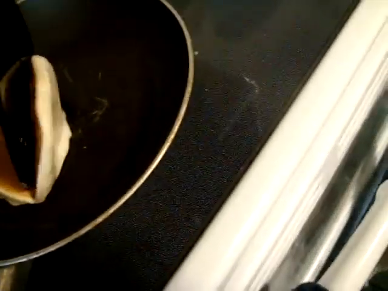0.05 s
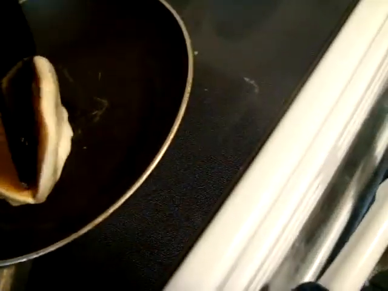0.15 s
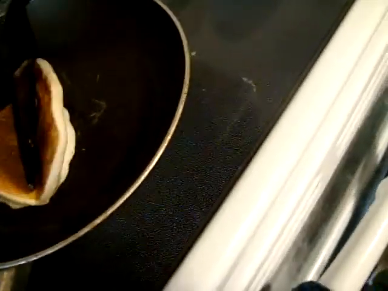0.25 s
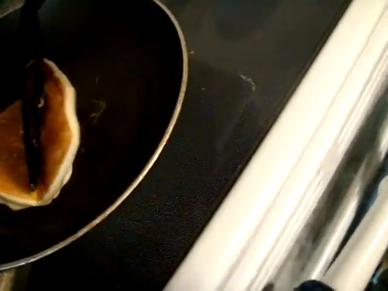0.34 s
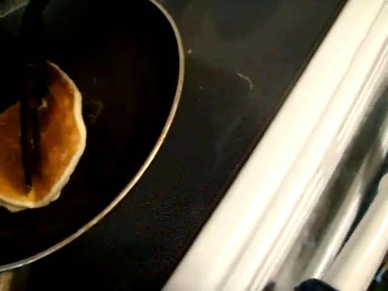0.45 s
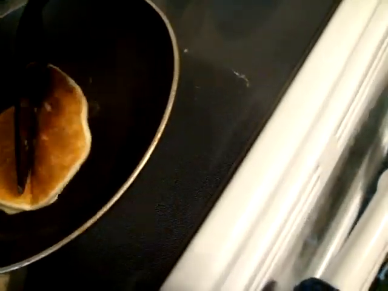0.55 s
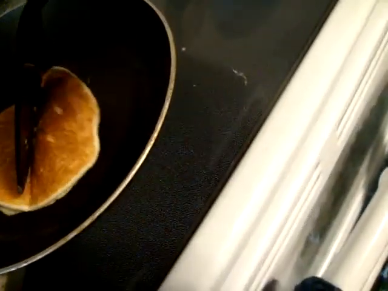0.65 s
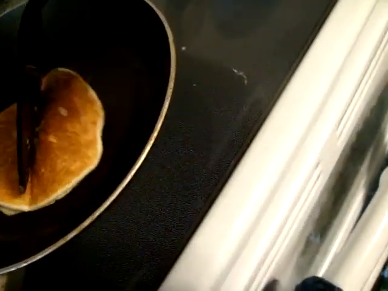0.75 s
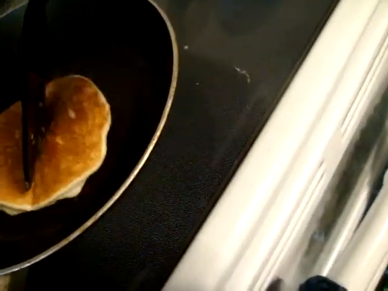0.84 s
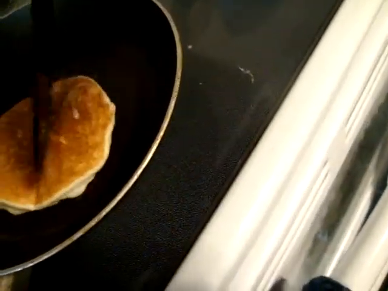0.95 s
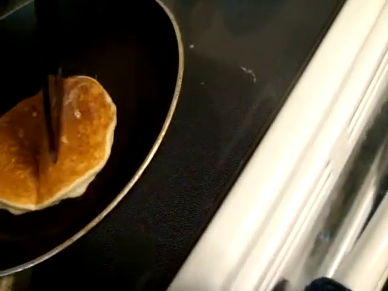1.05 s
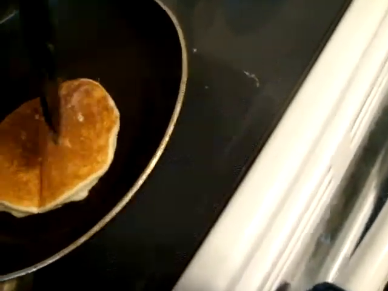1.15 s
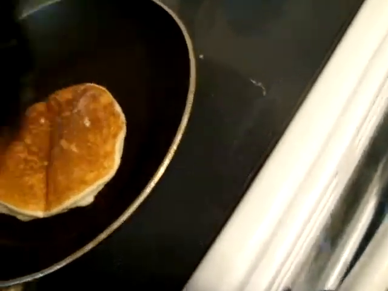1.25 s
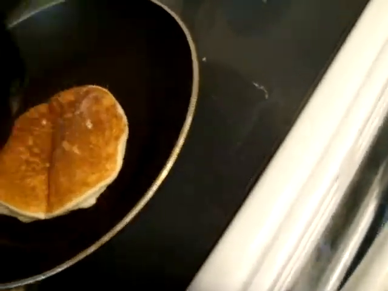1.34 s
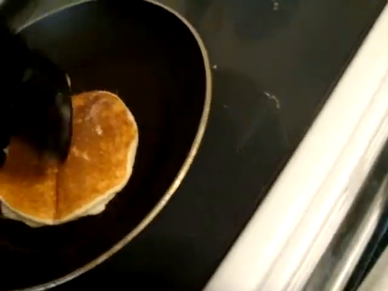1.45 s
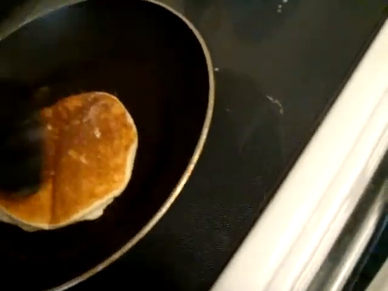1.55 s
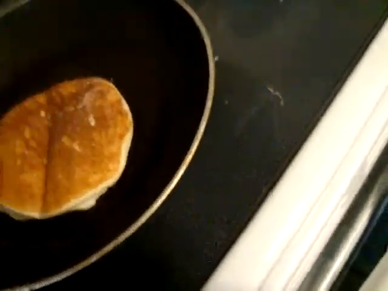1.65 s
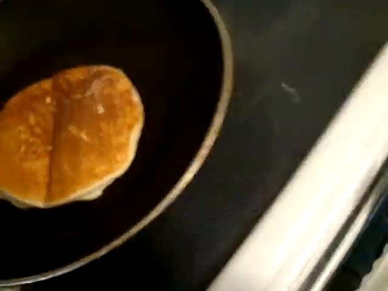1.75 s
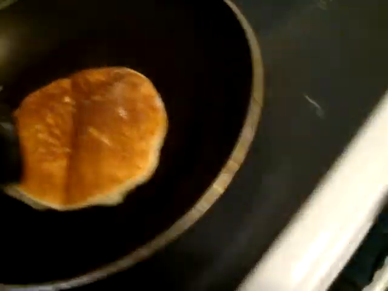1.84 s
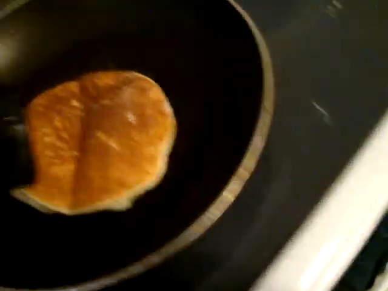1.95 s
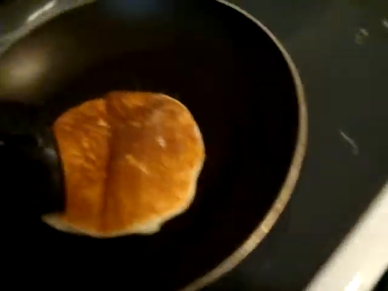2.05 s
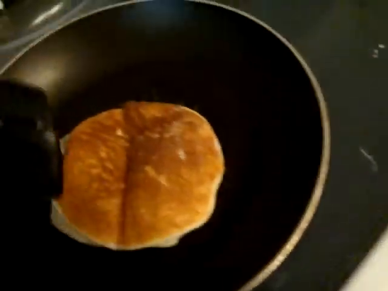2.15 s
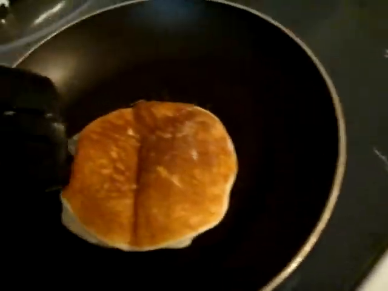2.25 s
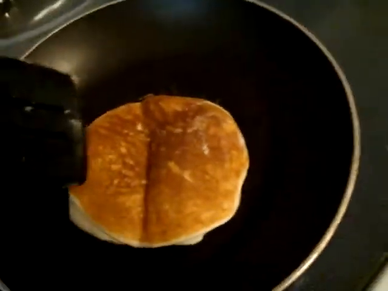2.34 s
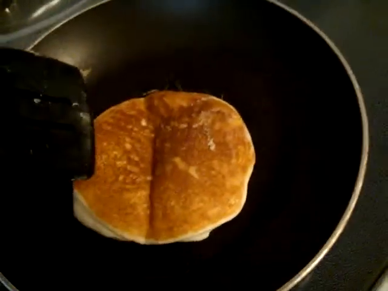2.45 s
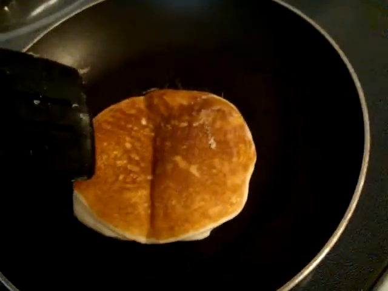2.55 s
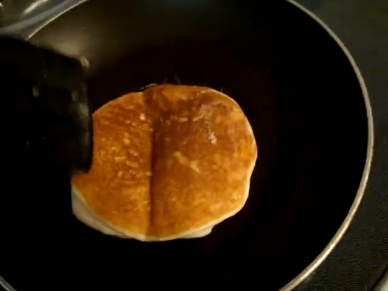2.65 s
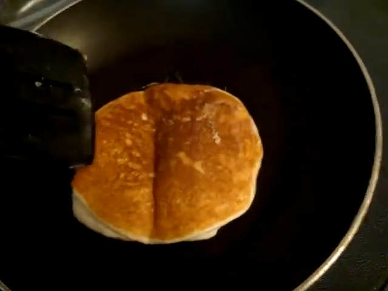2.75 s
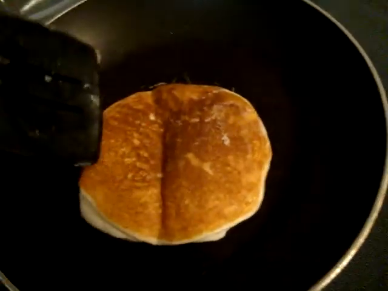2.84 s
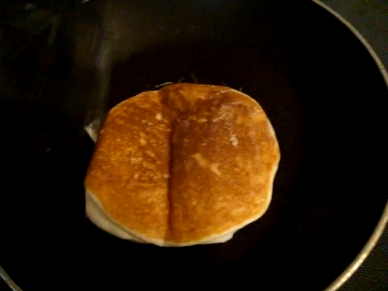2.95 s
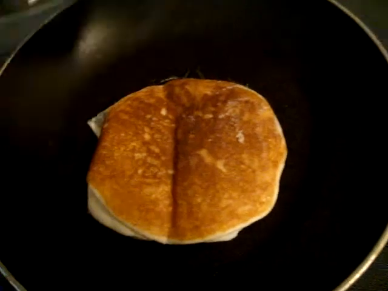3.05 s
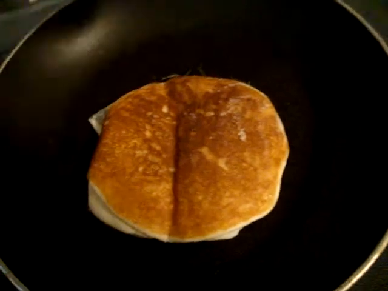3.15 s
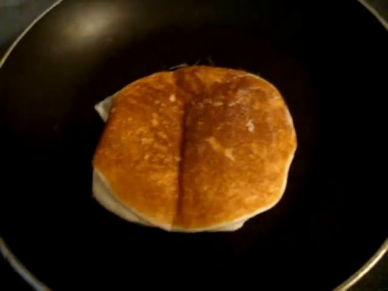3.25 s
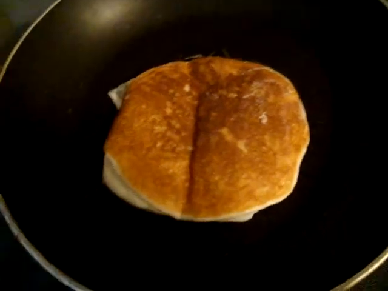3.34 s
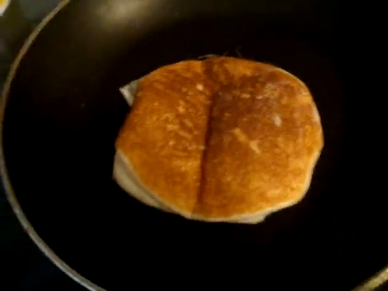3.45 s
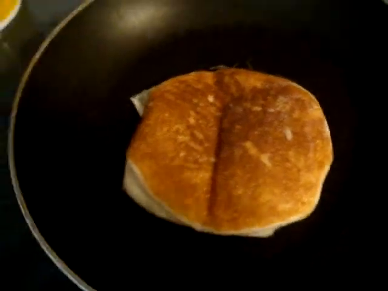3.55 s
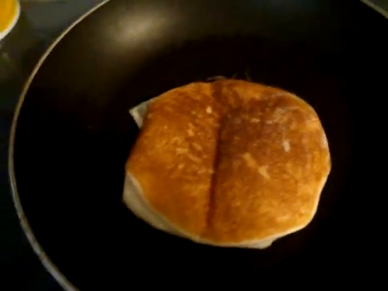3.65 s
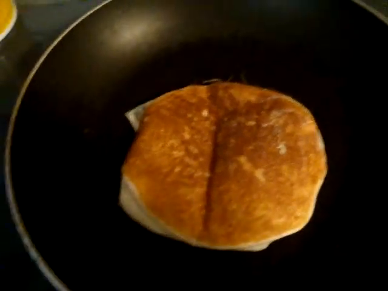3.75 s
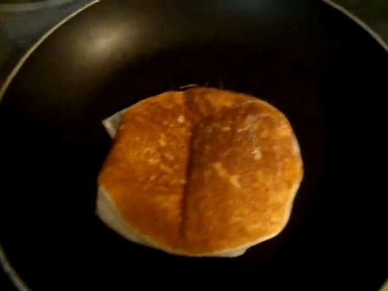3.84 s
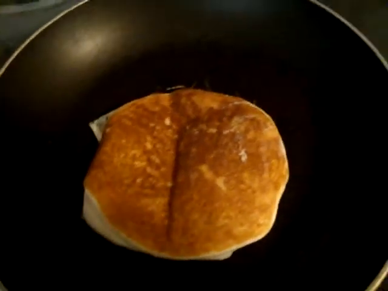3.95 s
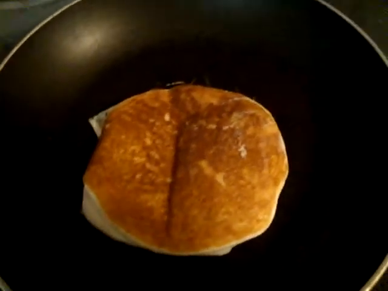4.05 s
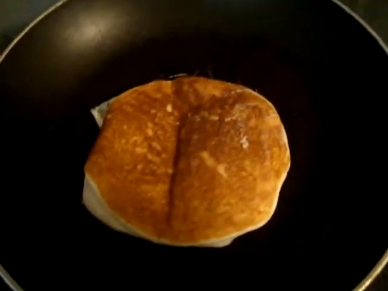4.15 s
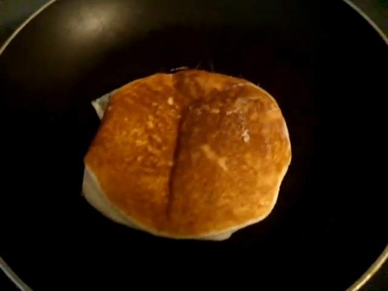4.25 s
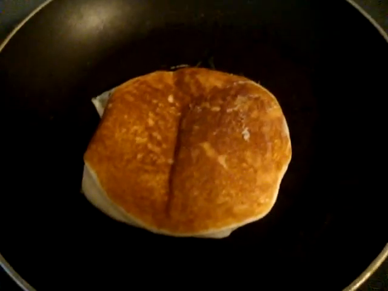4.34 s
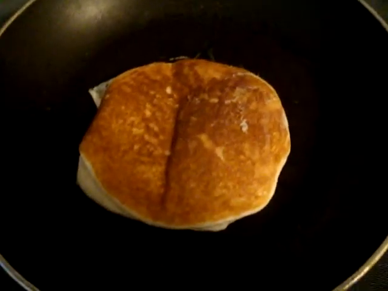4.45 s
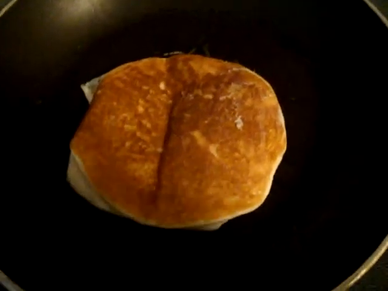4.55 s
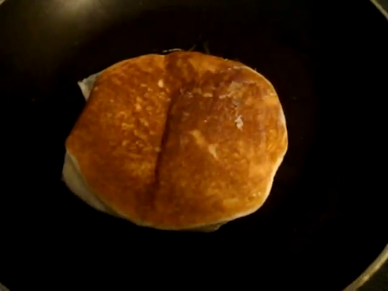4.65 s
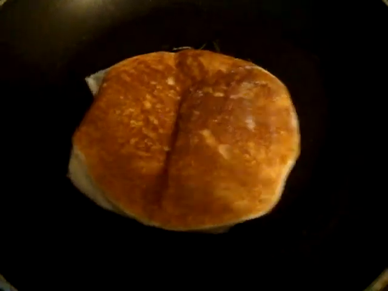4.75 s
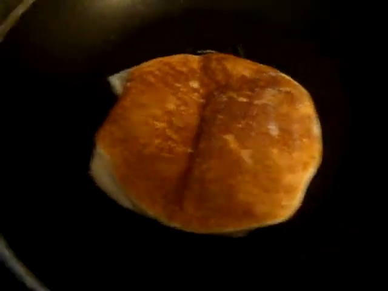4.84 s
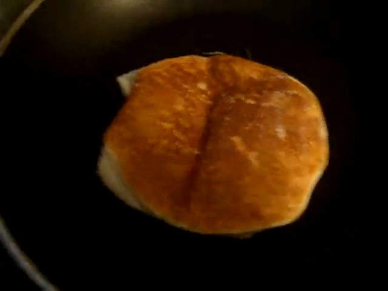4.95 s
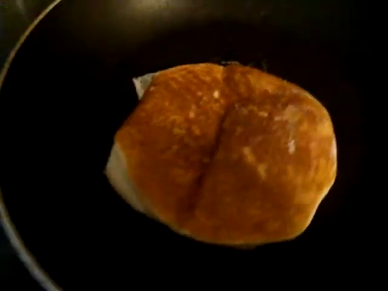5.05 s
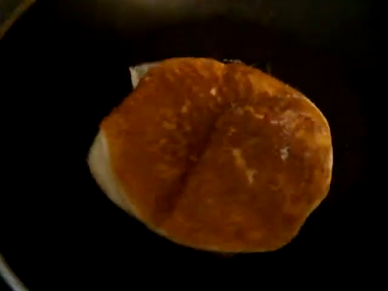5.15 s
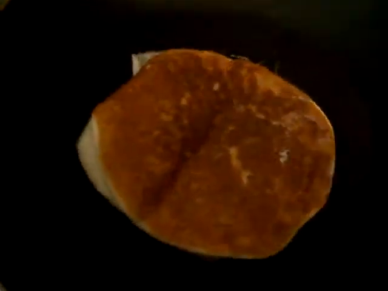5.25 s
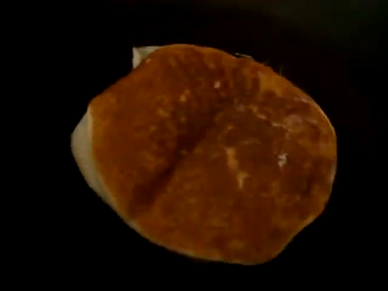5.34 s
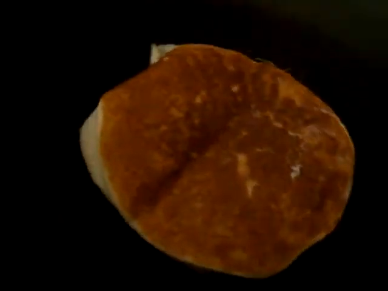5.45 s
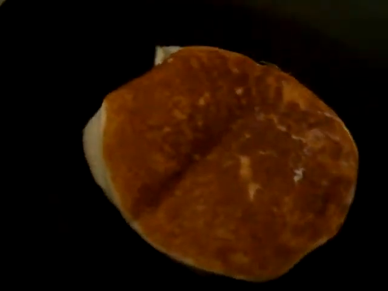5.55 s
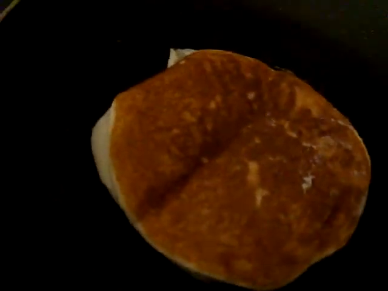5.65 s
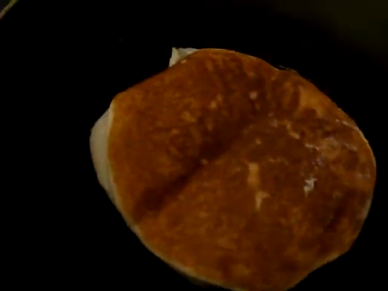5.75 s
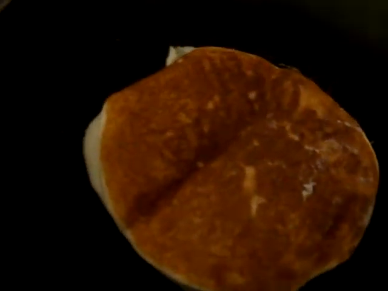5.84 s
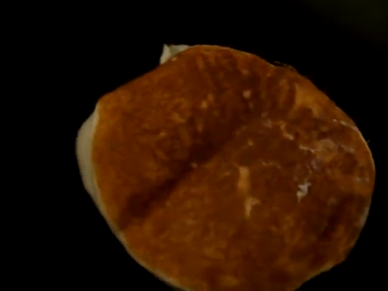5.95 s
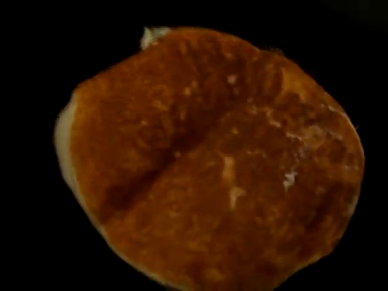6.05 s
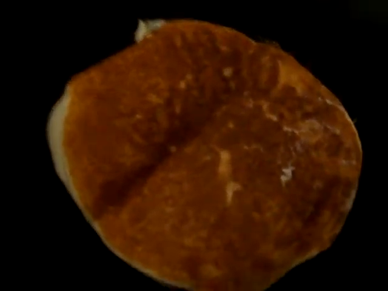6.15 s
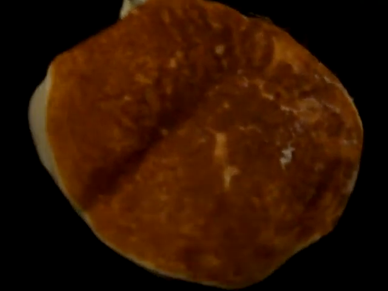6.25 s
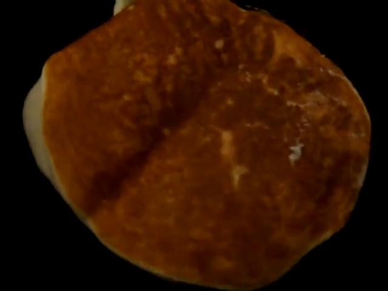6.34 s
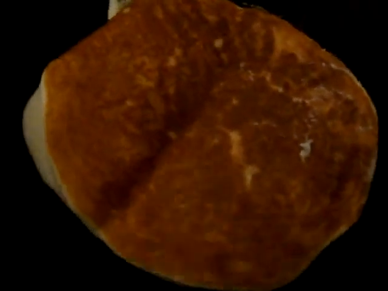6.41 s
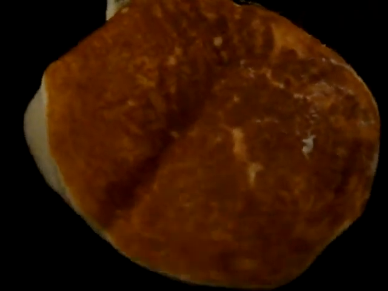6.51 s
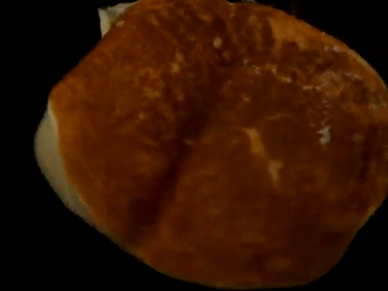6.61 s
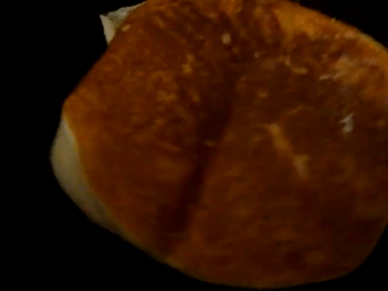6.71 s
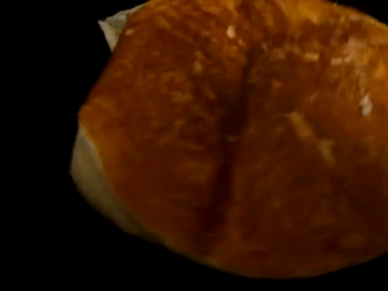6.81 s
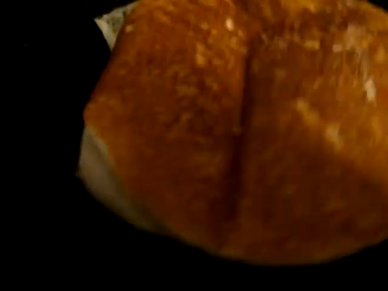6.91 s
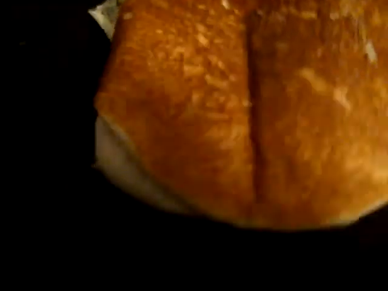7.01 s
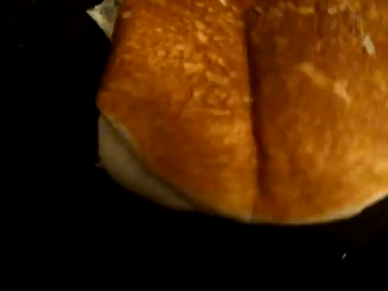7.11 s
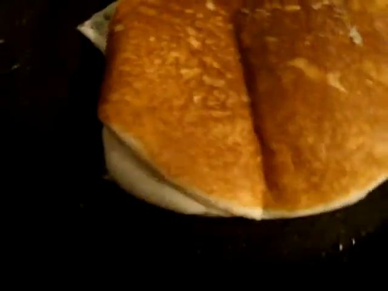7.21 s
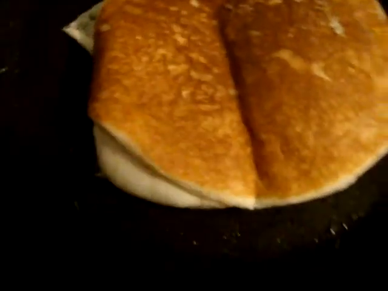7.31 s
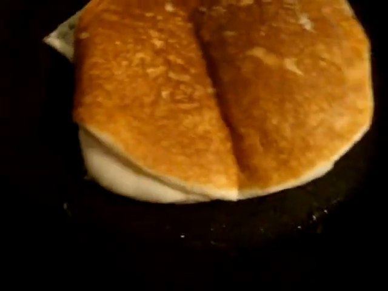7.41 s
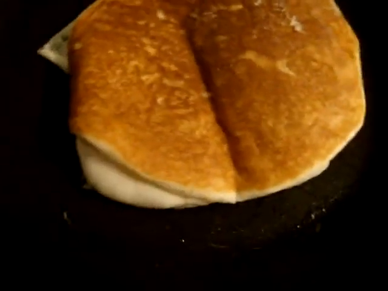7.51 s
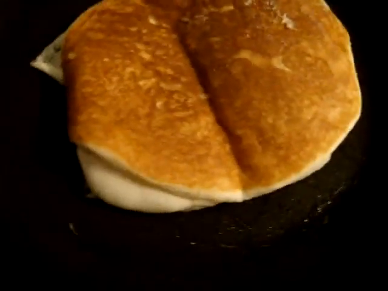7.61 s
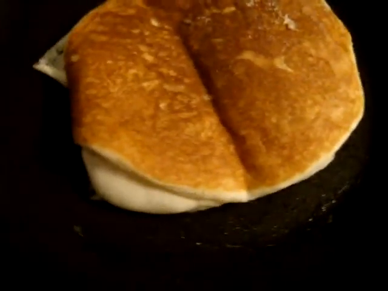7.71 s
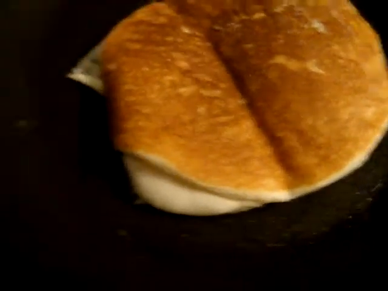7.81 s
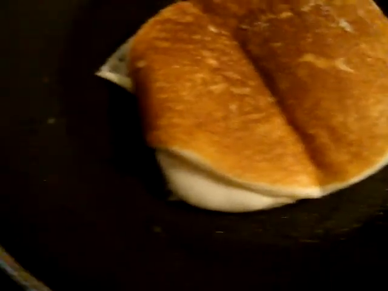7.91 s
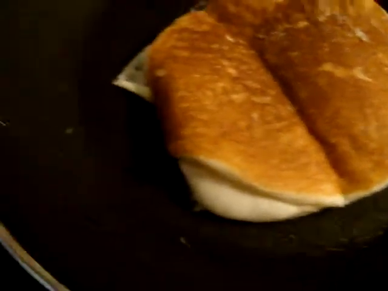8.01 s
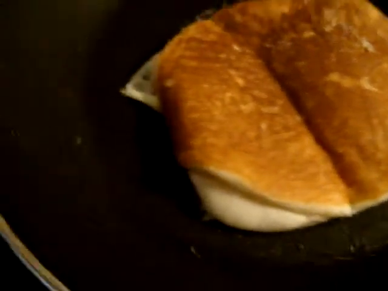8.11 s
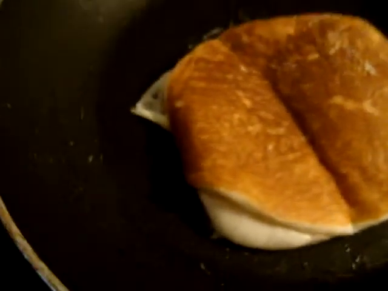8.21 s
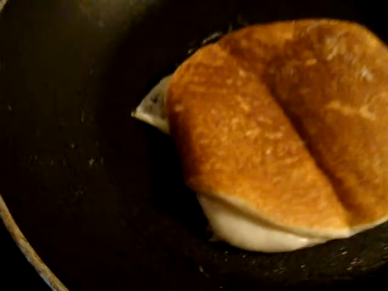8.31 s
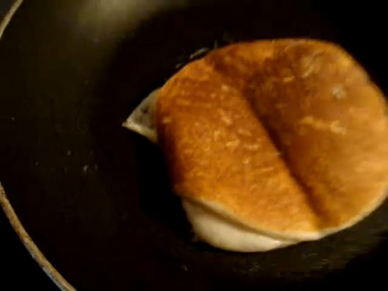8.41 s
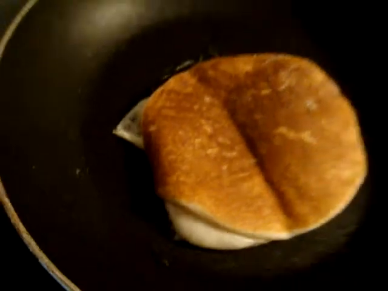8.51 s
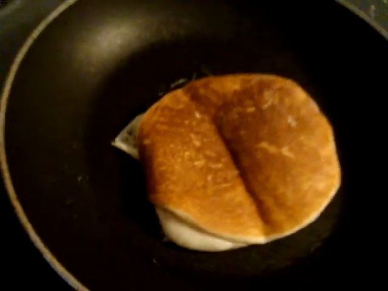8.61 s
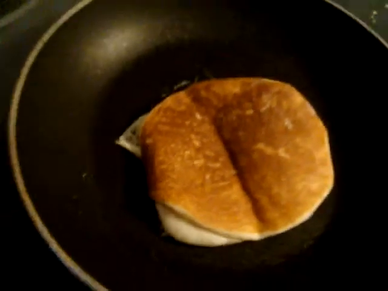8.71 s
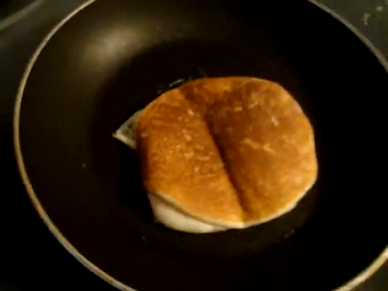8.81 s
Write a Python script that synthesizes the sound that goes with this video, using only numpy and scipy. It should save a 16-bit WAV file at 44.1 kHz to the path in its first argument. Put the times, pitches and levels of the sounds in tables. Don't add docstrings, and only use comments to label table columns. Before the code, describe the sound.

A low, airy extractor fan with soft duct hum runs steadily throughout, in a small kitchen with short reverberation. From 0 s a pancake's wet side meets the hot pan: bright steam fizz surges from about 0.15 s, fluttering in uneven spurts over a softer boiling seethe, with loud snapping pops and slight low air puffs. By 1.4 s the fizz falls away, leaving fine crackle and crisp, high pops until 4 s. Around 3.95 s a spatula scrapes; at 4.1 to 4.3 s it strikes the counter in hard, rattling metallic blows, the loudest overloading, then slides to rest with dull cabinet thumps by 4.55 s. Afterwards the crackle is muffled and fading, with irregular small pops, mostly lower and softer, and a few tiny bubble blips near 5.4 s. Faint breathy steam whistles leak at 7.6, 8.3 and 8.7 s before the end near 8.9 s. Close microphone, limited treble.

```python
import sys
import numpy as np
from scipy import signal
from scipy.fft import rfft, irfft, next_fast_len
from scipy.io import wavfile

SR = 44100
rng = np.random.default_rng(int(sys.argv[2]) if len(sys.argv) > 2 else 0)


def generate_wav(sig):
    pcm = np.round(np.clip(np.atleast_2d(sig).T, -1, 1) * 32767).astype(np.int16)
    wavfile.write(sys.argv[1], SR, pcm)


def natural_amplitude(level_db):
    exponent = np.asarray(level_db, float) / 20
    return 10 ** exponent


N = 391166


def rms_one(x):
    return x / np.sqrt(np.mean(x ** 2) + 1e-20)


def in_time(rows):
    s, *columns = np.transpose(rows)
    return [np.interp(np.arange(N) / SR, s, c) for c in columns]


def swell(start, db, attack_s, hold_s, dies_db_per_s):
    t = np.arange(N) / SR - start
    decay_s = np.maximum(t - attack_s - hold_s, 0)
    return np.clip(t / attack_s, 0, 1) ** 2 * natural_amplitude(db - dies_db_per_s * decay_s)


def drift(rate):
    r = np.exp(-80 * np.pi * rate / SR)
    draws = rng.standard_normal(N // 40 + 2002)
    slow = signal.lfilter([1], [1, -2 * r, r * r], draws)[2000:]
    return np.interp(np.arange(N) / 40, np.arange(len(slow)), rms_one(slow))


def colour(x, spectrum):
    hz, db = np.transpose(spectrum)
    size = next_fast_len(N)
    f = np.arange(size // 2 + 1) * SR / size + 1
    gain = natural_amplitude(np.interp(np.log(f), np.log(hz), db))
    return rms_one(irfft(rfft(x, size) * gain, size)[:N])


def ring(clicks, hz, t60):
    r, w = natural_amplitude(-60 / (t60 * SR)), 2 * np.pi * hz / SR
    return signal.lfilter([0, np.sin(w)], [1, -2 * r * np.cos(w), r * r], clicks + 1e-18)


def narrow_noise(modes):
    return sum(natural_amplitude(db) * rms_one(ring(rng.standard_normal(N), hz, 2.2 / width)) for hz, width, db in modes)


def add(out, s, sound):
    i = round(s * SR)
    out[i:i + len(sound)] += sound[:N - i]


def band(x, lo_hz, hi_hz):
    return signal.sosfilt(signal.butter(2, [lo_hz, min(hi_hz, .45 * SR)], "band", fs=SR, output="sos"), x)


def bursts(per_s, spread_db, length_s, bed):
    sizes = natural_amplitude(spread_db * np.minimum(rng.exponential(1, N), 2.5))
    born = rng.random(N) < per_s / SR
    r = np.exp(-1 / (length_s * SR))
    gate = rms_one(signal.lfilter([1], [1, -r], sizes * born + 1e-18))
    return (gate + bed) * rng.standard_normal(N)


# (time [s], level [dB])
STEAM_FORCE = [(0, -32.5), (.1, -30.5), (.15, -21), (.18, -26.5), (.25, -22), (.28, -18), (.42, -22.5),
               (.62, -22.5), (.66, -27), (.7, -20), (.782, -18.5), (.788, -28), (.88, -32), (.92, -23),
               (.98, -29), (1.0, -22.5), (1.11, -24.5), (1.4, -31)]


def steam_decay():
    force_db, = in_time(STEAM_FORCE)
    return force_db, np.maximum(np.arange(N) / SR - STEAM_FORCE[-1][0], 0)


# (frequency [Hz], density [dB per Hz])
FIZZ_SPECTRUM = [(1470, -37), (2500, -11), (3490, -31), (4660, -13.5), (6180, 1.5), (7220, 3), (9580, -4.5),
                 (9920, -4), (12900, -35), (21800, -120)]


def fizz():
    force_db, after = steam_decay()
    level_db = force_db - 16 * after - 3.5 * np.minimum(after / 0.1, 1)
    jet = colour(bursts(1300, spread_db=2.5, length_s=.0005, bed=.5), FIZZ_SPECTRUM)
    wide_gap = swell(.22, -4.5, attack_s=.03, hold_s=.43, dies_db_per_s=2000)
    return natural_amplitude(level_db - 6.0) * (jet + wide_gap * rms_one(band(jet, 4070, 6160)))


# (frequency [Hz], density [dB per Hz])
SEETHE_SPECTRUM = [(290, -44), (500, -30), (829, -1), (1040, -2.5), (1190, 1), (1410, -2.5), (3480, -7),
                   (4500, -3.5), (5850, -3.5), (9900, -120)]


def seethe():
    force_db, after = steam_decay()
    level_db = -36.5 + 0.47 * (force_db + 22) - 7.5 * after - 3.5 * np.minimum(after / 0.13, 1)
    boil = colour(bursts(600, spread_db=2.5, length_s=.0008, bed=2.5), SEETHE_SPECTRUM)
    return natural_amplitude(level_db + 4.0) * boil


# (frequency [Hz], density [dB per Hz])
CRACKLE_SPECTRUM = [(880, -26), (1500, -17), (2280, -1.5), (2780, -0.5), (5190, -4.5), (9540, 5.5),
                    (9920, 4), (12900, -86), (21800, -120)]


def crackle():
    t = np.arange(N) / SR
    per_s = 110 + 300 * np.exp(-t / 1.1)
    crust_s, crusting_s, crust_loss_db, cooling_db_per_s = 3.75, 0.8, 7.5, 2.67
    level_db = -41.5 - crust_loss_db / (1 + np.exp((crust_s - t) / crusting_s * 4))
    level_db -= cooling_db_per_s * np.maximum(t - crust_s, 0)
    rate = per_s * natural_amplitude(3.5 * drift(11))
    cracks = bursts(rate, spread_db=-1.0, length_s=0.00035, bed=0.026)
    return natural_amplitude(level_db) * colour(cracks, CRACKLE_SPECTRUM)


# (frequency [Hz], density [dB per Hz])
FAN_SPECTRUM = [(15, -44), (25, -24), (53, -9), (159, 0), (298, 2.5), (355, -1.5), (557, 1.5), (632, -3.5),
                (853, -4.5), (1180, -11), (1810, -8), (2440, -10.5), (3470, -13.5), (9200, -20.5),
                (9920, -37), (12900, -41), (21800, -120)]
# (time [s], level [dB])
FAN_LEVEL = [(0, -42.5), (1.3, -41), (2, -44), (4, -42.5), (6, -44), (8.5, -44), (8.87, -48.5)]
# (frequency [Hz], width [Hz], level [dB])
DUCT_MODES = [(105, 3.6, -58), (156.6, 1.5, -52), (201, 2.6, -51.5), (276.6, 12, -53), (315, 9.4, -52.5),
              (341, 10, -61), (403.5, 24, -48.5), (497, 16, -62)]


def fan():
    level_db, = in_time(FAN_LEVEL)
    level_db = level_db + .4 * drift(3)
    air = colour(rng.standard_normal(N), FAN_SPECTRUM)
    return natural_amplitude(level_db + 1.5) * air + natural_amplitude(level_db + 40.5) * narrow_noise(DUCT_MODES)


# (time [s], peak level [dB], ring frequency [Hz])
JETTING_POPS = [(0.1256, -13, 6800), (0.1895, -11, 6800), (0.2613, -12, 5460), (0.6015, -11, 6380),
                (0.6429, -11, 6820), (0.6933, -11, 6550), (0.7692, -9, 6760), (0.8275, -17, 7410),
                (0.8799, -17, 6270), (0.8984, -12, 7000), (0.9258, -9, 6780), (0.9946, -13, 7910),
                (1.0849, -14, 6240), (1.2506, -15, 7320), (1.2675, -15, 8560), (1.4815, -12, 8340)]
# (time [s], peak level [dB], ring frequency [Hz])
WET_POPS = [(1.6172, -15, 8230), (1.706, -15, 5750), (1.933, -14, 8140), (1.9514, -16, 8850),
            (2.0597, -15, 8950), (2.2682, -14, 8770), (2.3216, -15, 8490), (2.359, -17, 9150),
            (2.5072, -18, 8470), (2.5351, -15, 8730), (2.5511, -12, 7600), (2.7416, -18, 7180),
            (2.78, -16, 9360), (2.9147, -19, 4220), (2.9367, -19, 3800), (2.9536, -20, 8870),
            (2.9771, -11, 9080), (2.9945, -11, 9210), (3.0973, -12, 7700), (3.1831, -11, 7570),
            (3.2984, -15, 9070), (3.3787, -11, 9230), (3.4301, -14, 3850), (3.4765, -20, 9230),
            (3.5907, -19, 8800), (3.6406, -10, 4950), (3.7623, -17, 3000), (3.7927, -24, 6240),
            (3.9658, -25, 8080), (4.0102, -17, 3710)]
# (time [s], peak level [dB], ring frequency [Hz])
CRUST_POPS = [(4.5463, -16, 9370), (4.5872, -22, 2800), (4.7573, -11, 9430), (5.1818, -22, 6740),
              (5.2811, -22, 3020), (5.3989, -22, 3140), (5.4428, -26, 3360), (5.563, -24, 2660),
              (5.6423, -22, 6370), (5.7146, -21, 3670), (5.7456, -23, 3110), (5.7795, -27, 3610),
              (5.8019, -24, 2820), (5.9187, -27, 2730), (6.1716, -27, 6280), (6.3527, -26, 3850),
              (6.417, -30, 2700), (6.8176, -21, 2890), (6.8575, -21, 2510), (6.9069, -26, 3170),
              (6.9658, -23, 4880), (7.0301, -24, 2780), (7.0621, -24, 3100), (7.4018, -20, 3600),
              (7.5565, -18, 8690), (7.748, -18, 3570), (7.7909, -22, 2500), (8.3546, -25, 2740),
              (8.6325, -19, 7770), (8.7832, -25, 2680)]
# (time [s], peak level [dB], ring frequency [Hz])
DEEP_POPS = [(6.056, -29, 1500), (6.866, -25, 1400), (6.64, -27, 2500), (6.738, -27, 3300)]


def pops():
    out, t = np.zeros(N), np.arange(400) / SR
    rows = JETTING_POPS + WET_POPS + CRUST_POPS + DEEP_POPS + small_pops(WET_POPS + CRUST_POPS)
    noise = rng.standard_normal((len(rows), 2, len(t)))
    spit = noise[:, 0] * natural_amplitude(4 * noise[:, 1]) * 0.099 * np.exp(-t / 0.0016)
    spit[:, 0] = 1
    brights, bodies = band(spit, 5100, 14000), band(spit, 1100, 4500)
    for (s, db, hz), bright, body in zip(rows, brights, bodies):
        pop = bright - min((3400 / hz) ** 2, 1.6) * body
        pop = pop + 0.12 * ring(bright - body, hz, 7.3 / hz)
        add(out, s + .0006, natural_amplitude(db + 4.5) * pop / np.abs(pop).max())
    return out


# (time [s], peak level [dB], length [s])
AIR_PUFFS = [(0.208, -33, 0.031), (0.33, -31.5, 0.052), (0.4, -44, 0.046), (.64, -62, .05), (3.7, -59, 0.1),
             (4.208, -42, 0.031), (4.272, -40, 0.015), (4.394, -33, 0.061)]


def puffs():
    t = np.arange(N) / SR
    lumps = rms_one(band(rng.standard_normal(N), 9, 50))
    return lumps * sum(natural_amplitude(db) * np.exp(-((t - s) / length) ** 2 * 4) for s, db, length in AIR_PUFFS)


# (start [s], end [s], rate [1/s], mean peak level [dB], lowest ring [Hz], highest ring [Hz])
SMALL_POP_SPANS = [
    (1.55, 3.0, 24, -25, 5500, 9500),
    (3.0, 4.05, 4, -28, 4000, 9000),
    (4.6, 8.8, 15, -30.5, 2600, 7000),
]


def small_pops(clear):
    rows = []
    for start, end, per_s, db, lo_hz, hi_hz in SMALL_POP_SPANS:
        when, size, pitch = rng.random((round(per_s * (end - start)), 3)).T
        peak_db = db + 1.5 * (4 * size - 2)
        rows += zip(start + (end - start) * when, peak_db, lo_hz * (hi_hz / lo_hz) ** pitch)
    s, db, hz = np.repeat(clear, 2, axis=0).T
    when, size, pitch = rng.uniform(-0.83, 1, (len(s), 3)).T
    peak_db = np.minimum(db, -18) - 10.5 + 1.7 * size
    return rows + list(zip(s + .06 * when, peak_db, np.clip(hz * 1.5 ** pitch, 2500, 9500)))


# (time [s], peak level [dB], frequency [Hz], rise time [s])
CABINET_KNOCKS = [(1.232, -30.5, 723, 0.0072), (3.962, -33, 1048, 0.0053), (4.042, -32, 760, .008),
                  (4.113, -16.5, 995, 0.0042), (4.386, -23, 448, 0.0089), (4.508, -25.5, 385, 0.0049),
                  (4.370, -17.5, 249.4, 0.0098), (4.372, -25, 159.6, 0.014), (4.381, -18.5, 1096, 0.0054),
                  (4.400, -23, 309, 0.009), (4.501, -17, 258.4, 0.008), (4.497, -22, 480, 0.0047),
                  (4.53, -27, 281, 0.0061)]


def knocks():
    out, t = np.zeros(N), np.arange(4000) / SR
    for s, db, hz, rise in CABINET_KNOCKS:
        envelope = (t / rise) ** 2 * np.exp(2 - 2 * t / rise)
        add(out, s, natural_amplitude(db) * np.sin(2 * np.pi * hz * t) * envelope)
    return out


# (start time [s], level [dB], attack [s], hold [s], decay [dB per s])
SLIDES = [
    (3.952, -41.5, 0.024, .04, 302),
    (4.007, -35.5, 0.041, .01, 131),
    (4.131, -39, .03, .03, 296),
    (4.185, -25.5, .012, .11, 283),
    (4.368, -26.5, .012, .005, 136),
]
# (frequency [Hz], density [dB per Hz])
DRAG_SPECTRUM = [(120, -38), (250, -0.5), (600, 1), (1000, -2.5), (1900, -0.5), (3000, -3.5), (5000, -7),
                 (10000, -10.5), (13000, -60)]
# (frequency [Hz], width [Hz], level [dB])
STEEL_MODES = [(477, 25, -26), (1040, 37, -5), (2116, 38, -9), (2850, 50, -17), (4340, 190, -9),
               (5640, 900, -5.5)]
# (time [s], level [dB])
SINGING = [(4.37, -88.5), (4.385, -29.5), (4.40, -23), (4.48, -38), (4.52, -54)]


def drag():
    level = sum(swell(*row) for row in SLIDES)
    sing_db, = in_time(SINGING + [(4.6, -99)])
    rough = colour(bursts(1200, spread_db=3, length_s=.0007, bed=1), DRAG_SPECTRUM)
    return natural_amplitude(3.0) * level * rough + natural_amplitude(sing_db) * narrow_noise(STEEL_MODES)


# (time [s], peak level [dB], highs [dB], lows [dB], rattle time [s])
SPATULA_BLOWS = [(3.966, -30, -18, -7, 0.0086), (4.114, -4.5, 1.5, -15, 0.0061),
                 (4.1185, -11.5, -18.5, 8, 0.0015), (4.191, 4.5, 3, -7.5, 0.0031),
                 (4.196, -0.5, 4.5, -16, 0.0037), (4.24, 1, 5.5, 1, 0.0055),
                 (4.2461, -1.5, -31, -36, 0.013), (4.273, -4.5, -9, -26, 0.0044),
                 (4.297, -13, -29, -2, 0.011), (4.380, -31.5, -2, -3, 0.024)]
# (frequency [Hz], level [dB], T60 [s])
SPATULA_MODES = [(680, -27, 0.032), (1140, -31, 0.086), (1284, -8.5, 0.014), (1820, -26, 0.097),
                 (1935, 6, 0.032), (2230, -6, 0.05), (2730, 1, 0.01), (3485, -3.5, 0.024),
                 (3900, -7, 0.015)]


def clatter():
    out, t = np.zeros(N), np.arange(6000) / SR
    draws = rng.standard_normal((len(SPATULA_BLOWS), 2, len(t)))
    for (s, db, high_db, low_db, rattle), (contact, shares) in zip(SPATULA_BLOWS, draws):
        contact = contact * (np.exp(-t / rattle) + .06 * np.exp(-t / .035))
        modes = zip(SPATULA_MODES, shares)
        body = sum(natural_amplitude(m_db + 2 * share) * ring(contact, hz, t60) for (hz, m_db, t60), share in modes)
        parts = rms_one(body) + natural_amplitude(-0.5) * rms_one(band(contact, 640, 3300))
        parts += natural_amplitude(high_db) * rms_one(band(contact, 4100, 7500))
        parts += natural_amplitude(low_db) * rms_one(band(contact, 120, 710))
        add(out, s, natural_amplitude(db) * parts / np.abs(parts).max())
    return out


# (time [s], peak level [dB], frequency [Hz])
FAT_BUBBLES = [(4.886, -34, 1040), (5.384, -29, 1290), (5.384, -29.5, 1830), (5.471, -30, 2080),
               (8.162, -37, 2280)]


def fat_bubbles():
    out, t = np.zeros(N), np.arange(2000) / SR
    envelope = np.exp(-t / 0.0067) * (1 - np.exp(-t / 0.0005))
    for s, db, hz in FAT_BUBBLES:
        add(out, s, natural_amplitude(db) * np.sin(2 * np.pi * hz * t) * envelope)
    return out


# (start time [s], level [dB], swell [s], hold [s])
RIM_LEAKS = [
    (7.57, -52, .04, .12),
    (8.3, -49.5, .2, .2),
    (8.66, -48.5, .08, .055),
]
# (frequency [Hz], width [Hz], level [dB])
GAP_MODES = [(1750, 200, -3), (2200, 200, 0)]


def leaks():
    level = sum(swell(*row, dies_db_per_s=408) for row in RIM_LEAKS)
    return level * natural_amplitude(1.5 * drift(25)) * narrow_noise(GAP_MODES)


def kitchen(x):
    t60_s, wall_cut_hz = 0.38, 2400
    size = next_fast_len(N + SR)
    w = 2 * np.pi * np.arange(size // 2 + 1) / size
    dull = 1 / (1 + 1j * w * SR / (2 * np.pi * wall_cut_hz))
    tail = 0
    for k, lag in enumerate((rng.uniform(.006, .03, 8) * SR).astype(int)):
        loop = natural_amplitude(-60 * lag / SR / t60_s) * dull * np.exp(-1j * w * lag)
        tail = tail + (-1) ** k * loop / (1 - loop)
    return irfft(rfft(x, size) * tail, size)[:N]


def scene():
    jet = fizz()
    frying = seethe() + crackle() + leaks()
    frying += jet * natural_amplitude(.8 * drift(23))
    pan = frying + pops() + fat_bubbles()
    counter = knocks() + clatter() + drag()
    room = kitchen(natural_amplitude(-20.5) * pan + natural_amplitude(-15) * counter)
    return (pan + counter + room + fan() + puffs())[None]


# (frequency [Hz], level [dB])
STEP_LEVEL = [(1000, -34), (3000, -20), (4200, -12), (5200, -4), (10000, -2)]


def quantise_blocks(x):
    hop, wide = 128, 4
    frame_s, frame_start_s, sudden_db = .036, .0085, 7
    count = N // hop + 2
    n, k = np.arange(2 * hop) + .5, np.arange(hop) + .5
    window = np.sin(np.pi * n / (2 * hop))
    basis = window * np.cos(np.pi / hop * np.outer(k, n + hop / 2)) * np.sqrt(2 / hop)
    halves = np.pad(x, (hop, count * hop - N)).reshape(-1, hop)
    lines = (np.hstack([halves[:-1], halves[1:]]) @ basis.T).reshape(count, -1, wide)
    frame = np.floor((np.arange(count) * hop / SR - frame_start_s) / frame_s).astype(int) + 1
    firsts = np.searchsorted(frame, np.arange(frame[-1] + 1))
    loudest = np.sqrt(np.maximum.reduceat((lines ** 2).mean(axis=2), firsts))[frame]
    highs = (lines[:, 6:14] ** 2).mean(axis=(1, 2)) + 1e-18
    quiet = np.exp(np.add.reduceat(np.log(highs), firsts) / np.diff(firsts, append=count))
    sudden = np.maximum.reduceat(highs, firsts) > quiet * natural_amplitude(2 * sudden_db)
    loudest *= np.where(sudden, 1, .25)[frame, None]
    hz, under_db = np.transpose(STEP_LEVEL)
    band_hz = (np.arange(hop // wide) + .5) * wide * SR / 2 / hop
    step = (loudest * natural_amplitude(np.interp(band_hz, hz, under_db)) + 1e-12)[..., None]
    coarse = step * np.sign(lines) * np.floor(np.abs(lines) / step + .4)
    blocks = (.93 * coarse + .07 * lines).reshape(count, hop) @ basis
    return (blocks[1:, :hop] + blocks[:-1, hop:]).ravel()[:N]


def low_pass(x):
    return signal.sosfilt(signal.butter(12, 10070, fs=SR, output="sos"), x)


def record(dry):
    steep = signal.ellip(8, .3, 40, 10060, fs=SR, output="sos")
    cut = signal.sosfiltfilt(steep, quantise_blocks(dry[0]))
    return low_pass(np.clip(cut, -1, 1)[None])


dry = scene()
out = record(dry)
generate_wav(out)
```